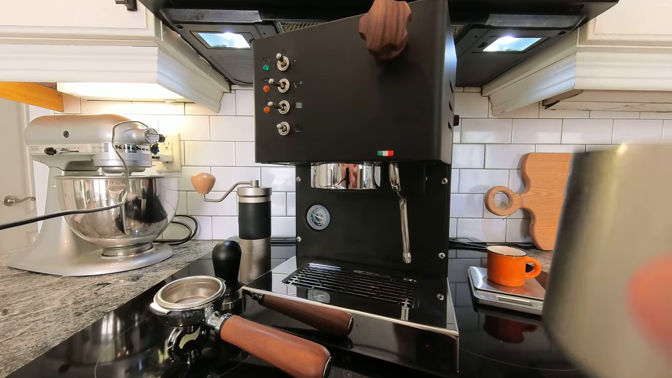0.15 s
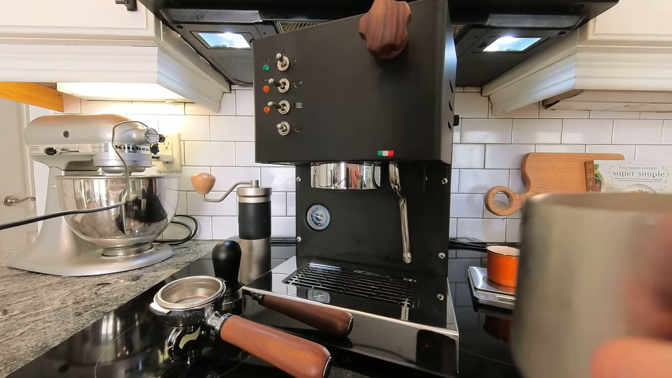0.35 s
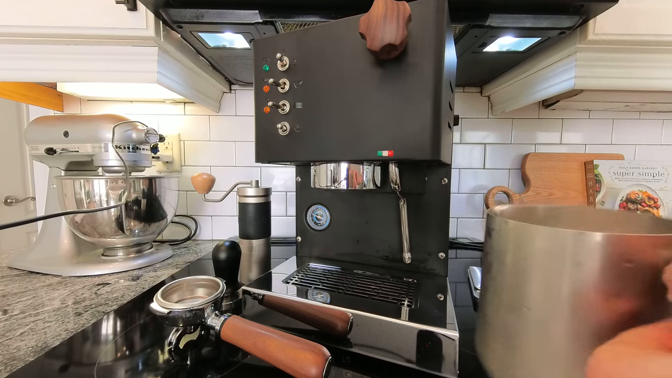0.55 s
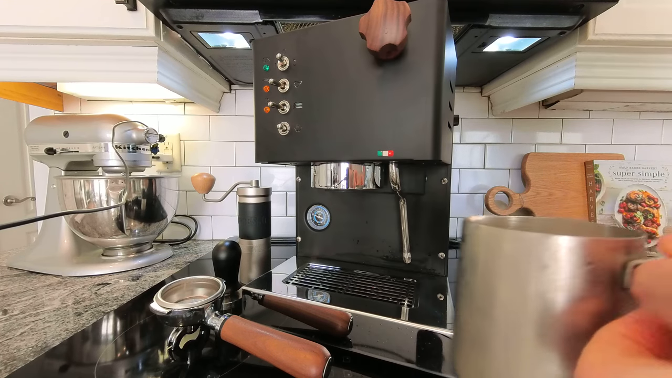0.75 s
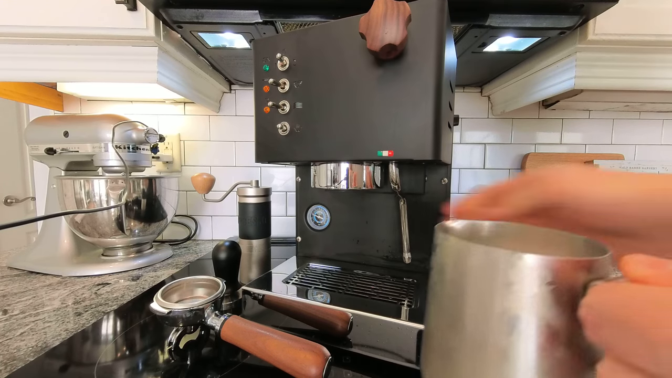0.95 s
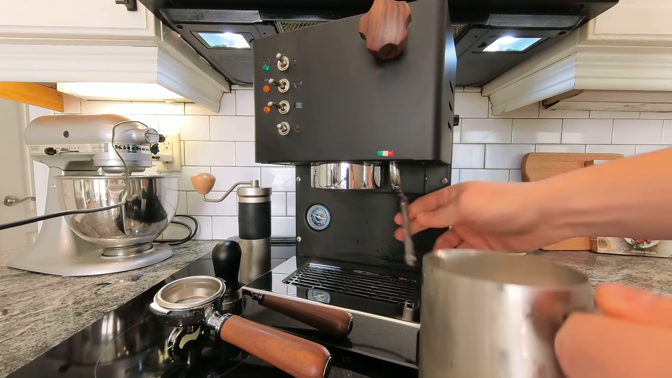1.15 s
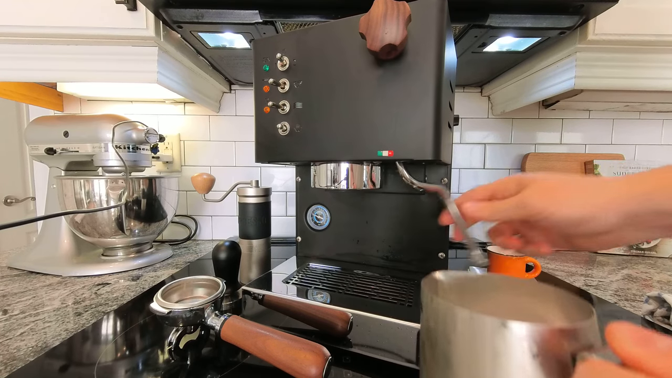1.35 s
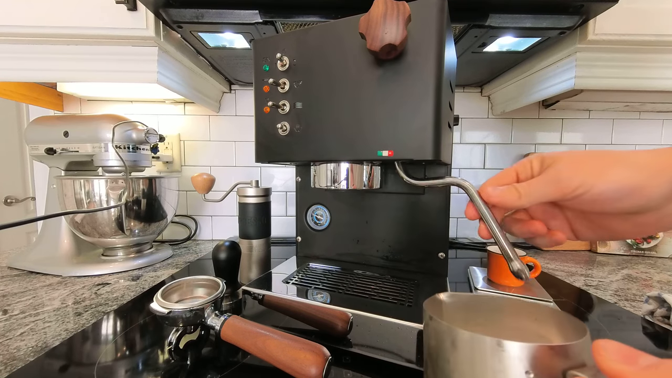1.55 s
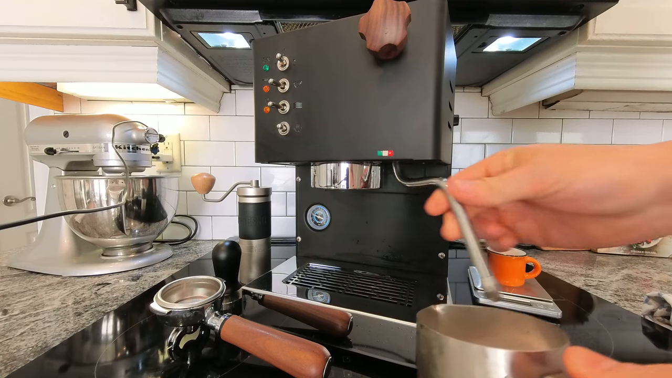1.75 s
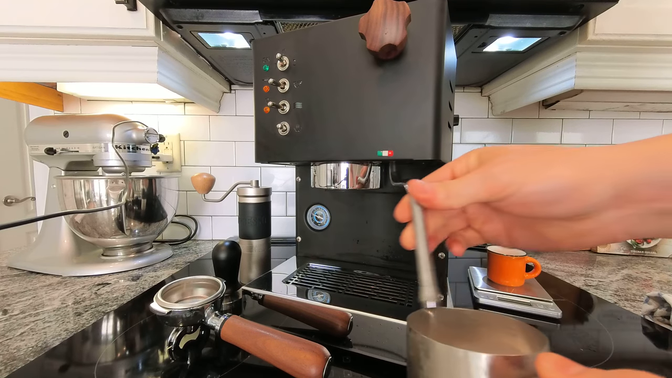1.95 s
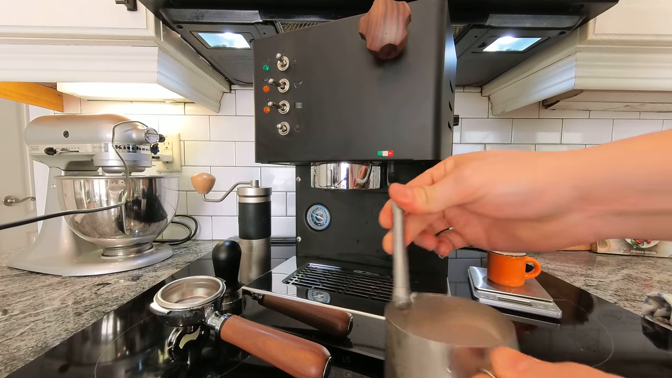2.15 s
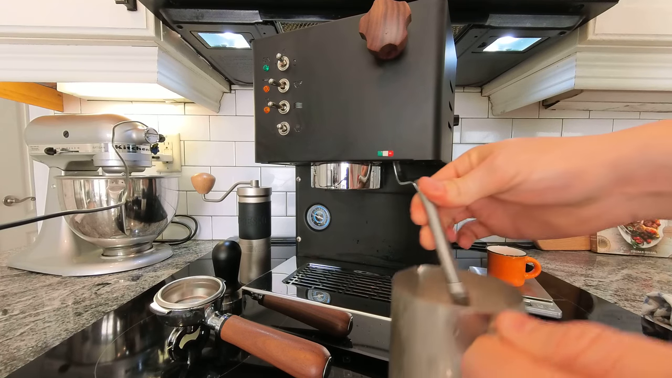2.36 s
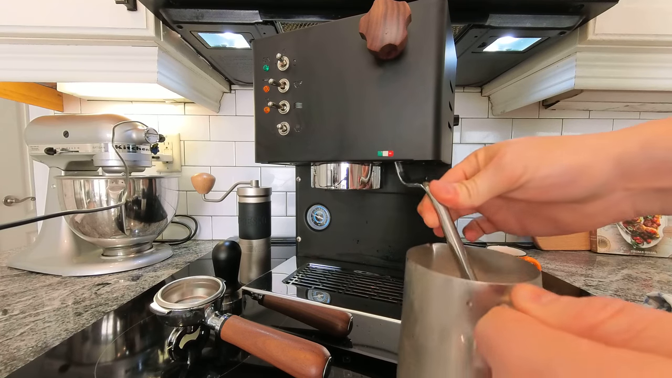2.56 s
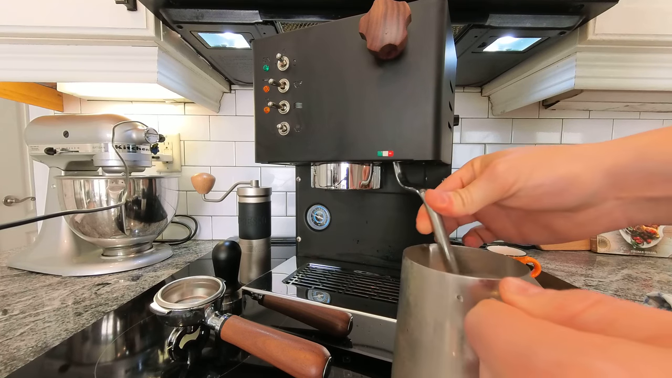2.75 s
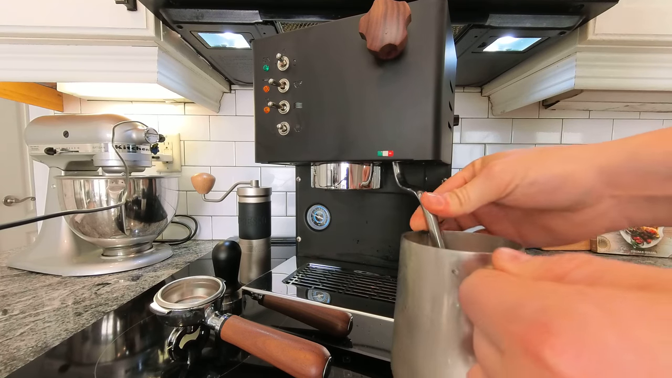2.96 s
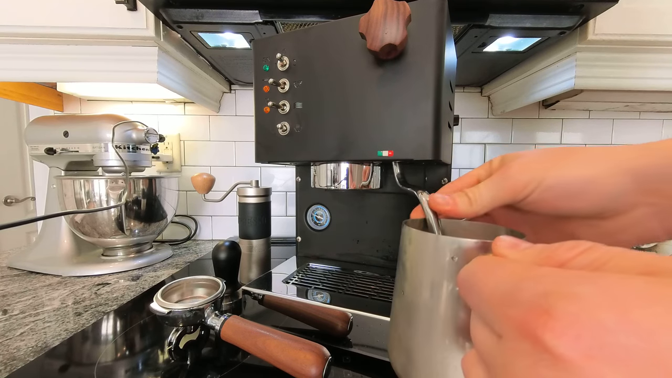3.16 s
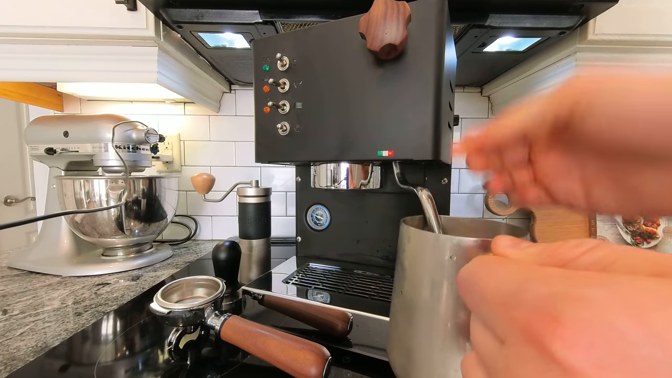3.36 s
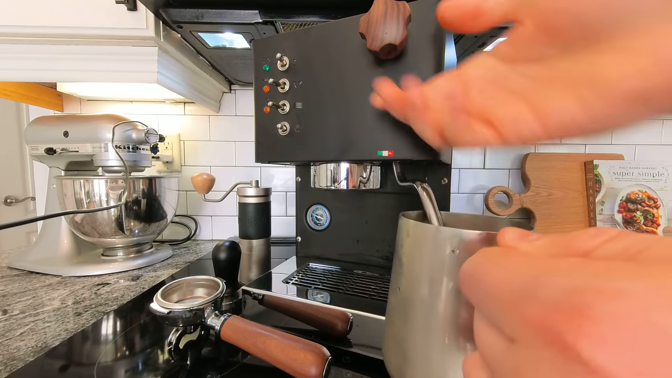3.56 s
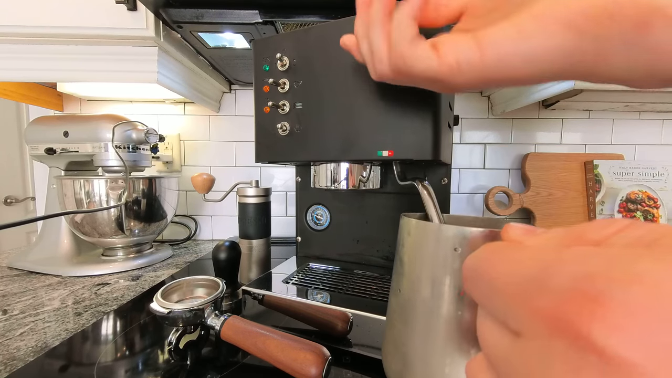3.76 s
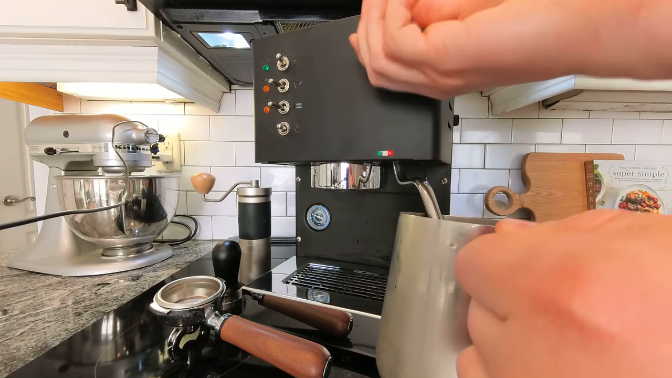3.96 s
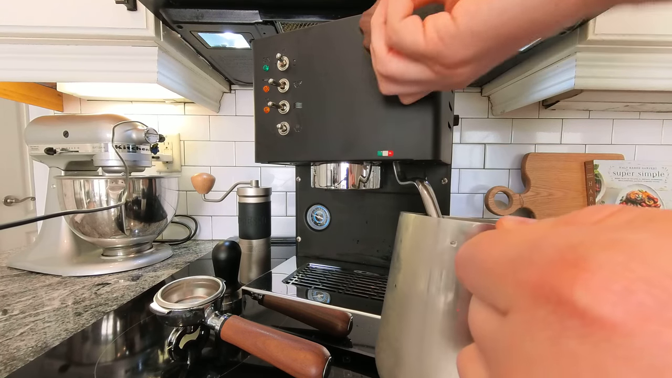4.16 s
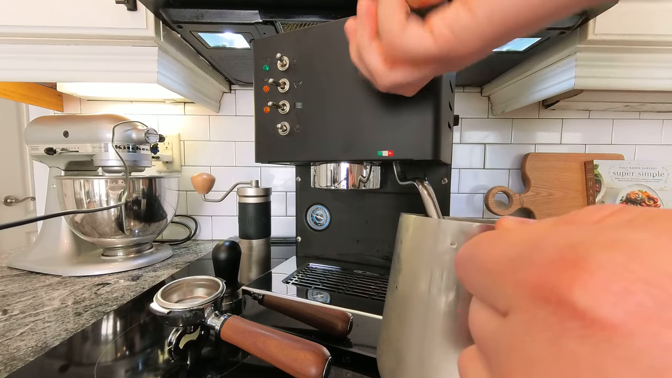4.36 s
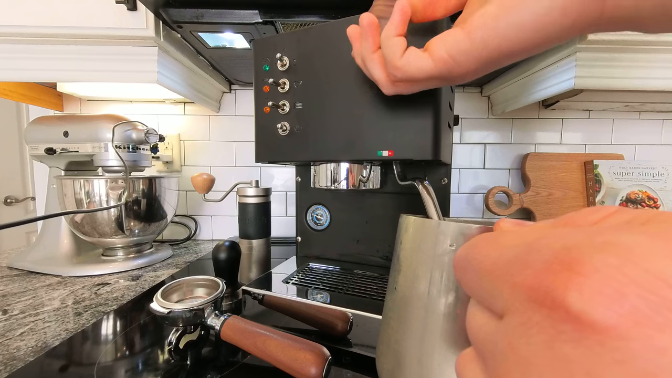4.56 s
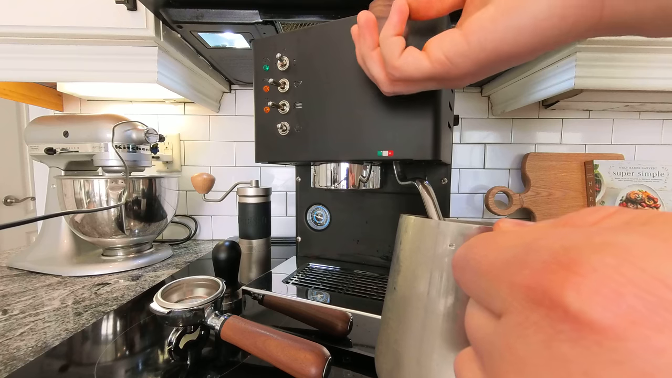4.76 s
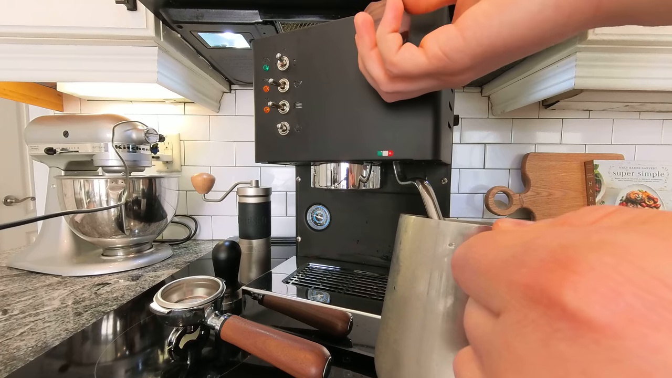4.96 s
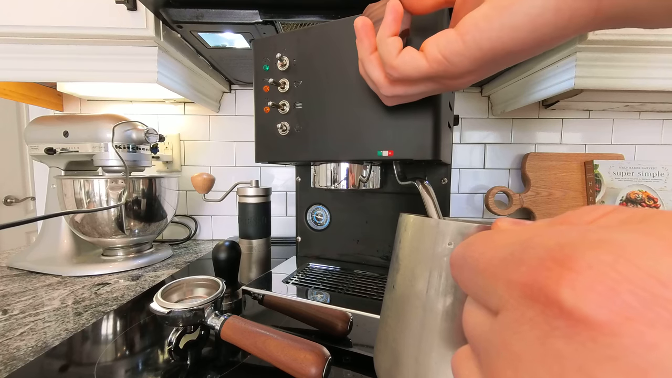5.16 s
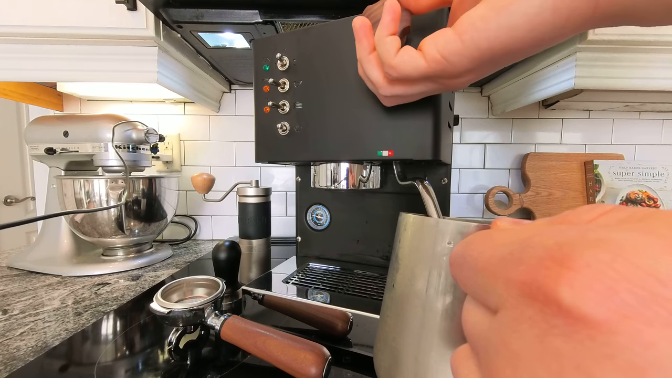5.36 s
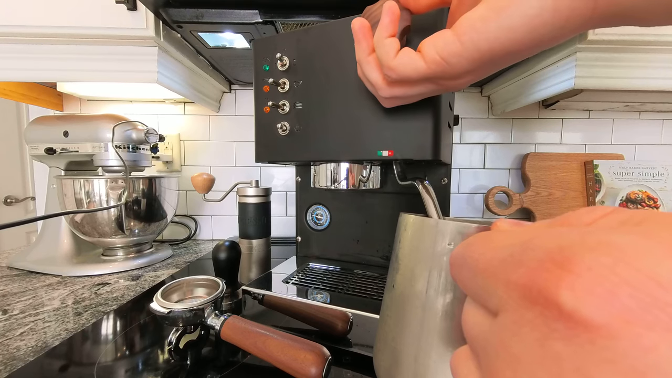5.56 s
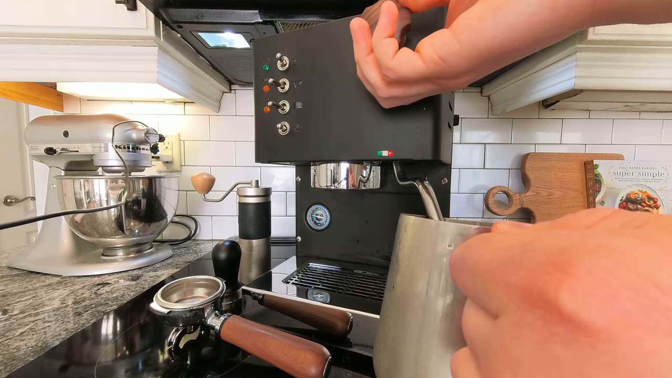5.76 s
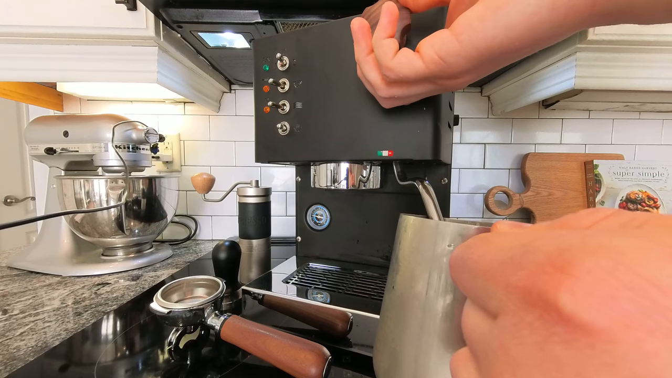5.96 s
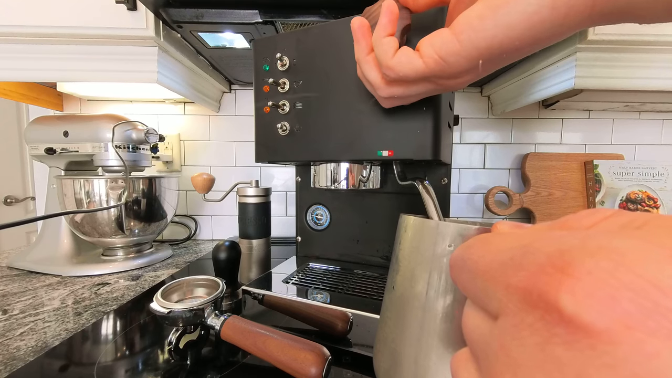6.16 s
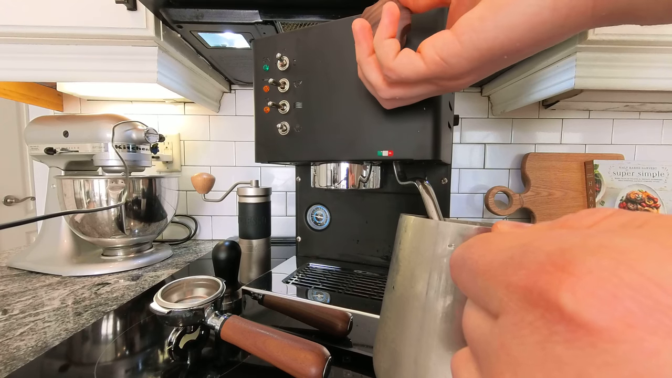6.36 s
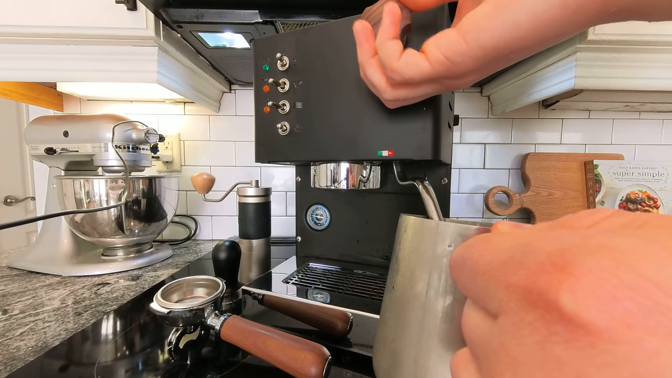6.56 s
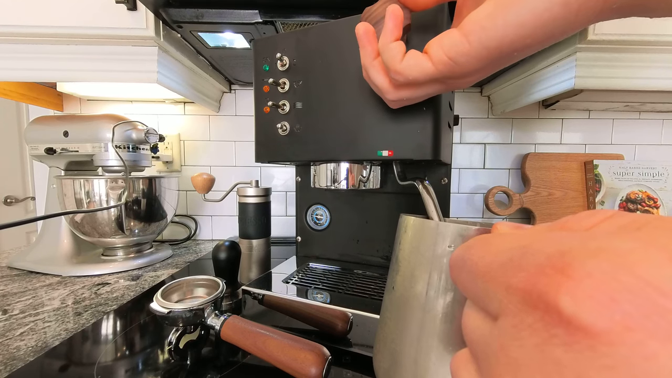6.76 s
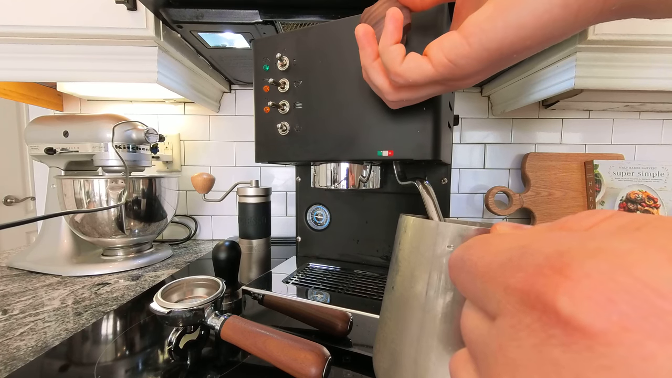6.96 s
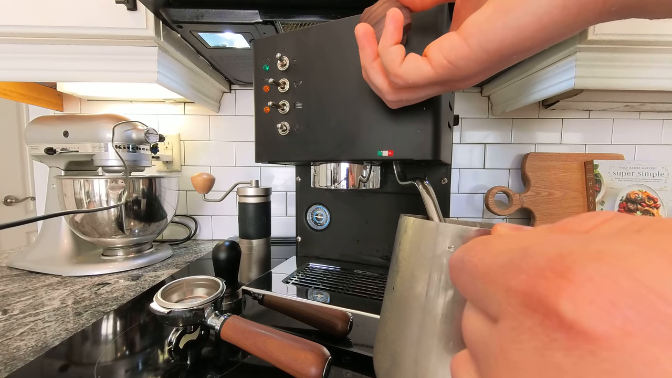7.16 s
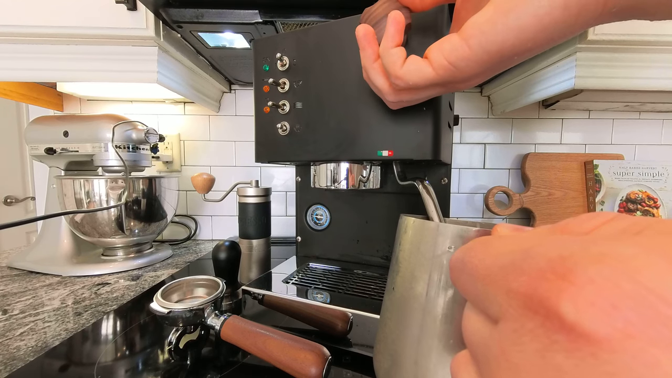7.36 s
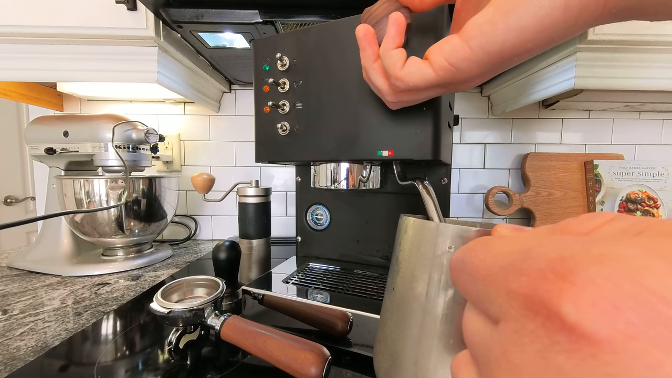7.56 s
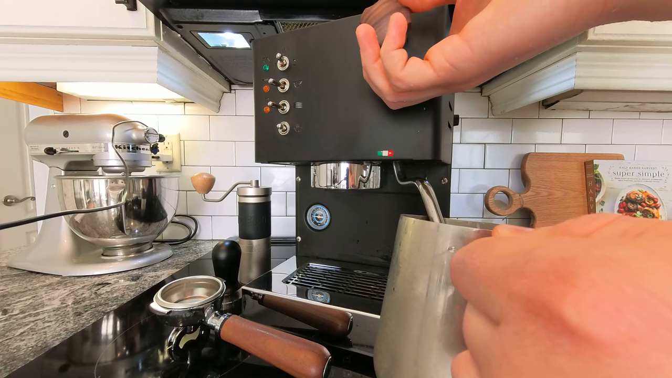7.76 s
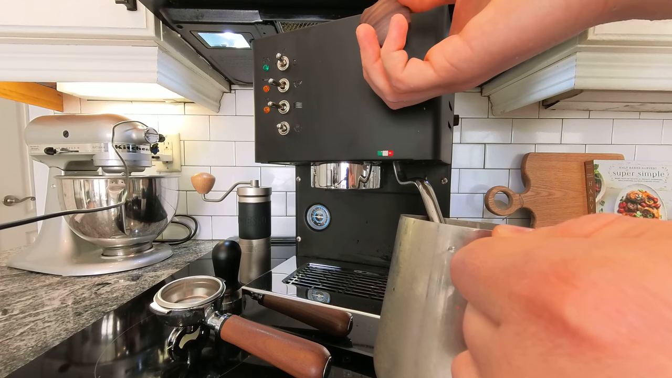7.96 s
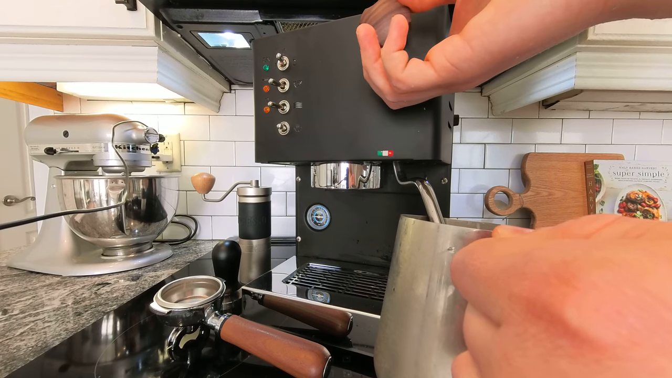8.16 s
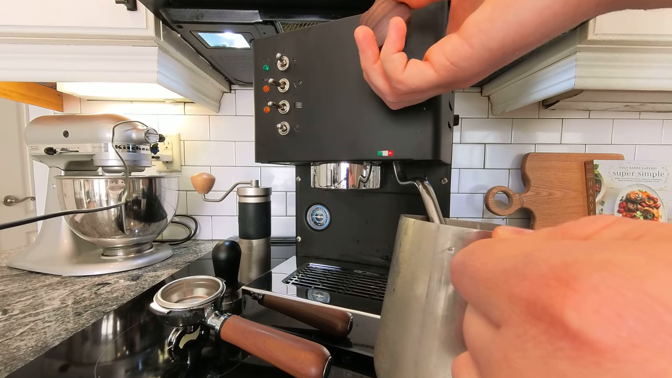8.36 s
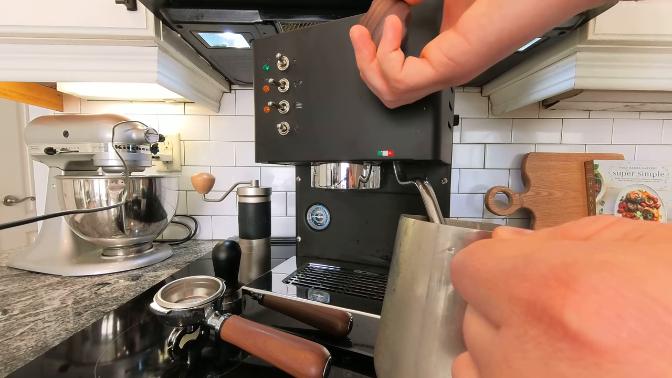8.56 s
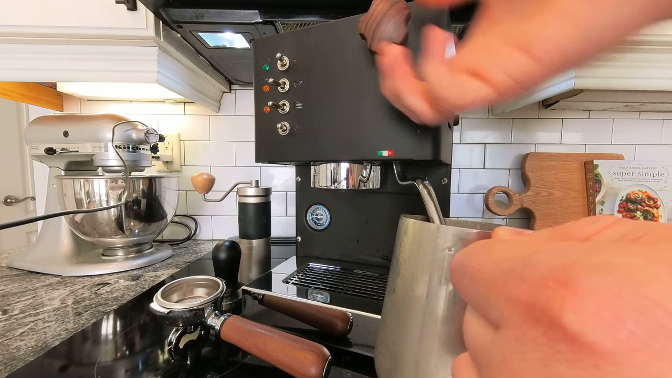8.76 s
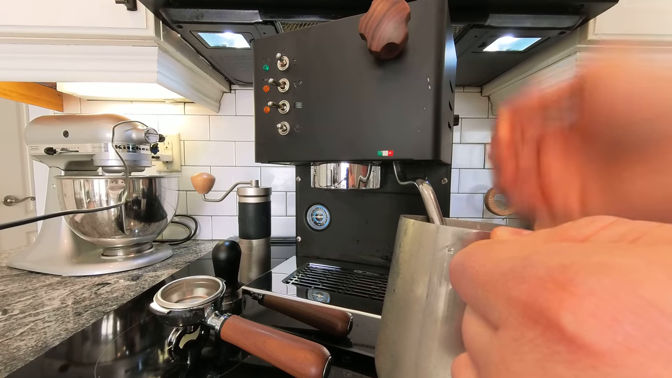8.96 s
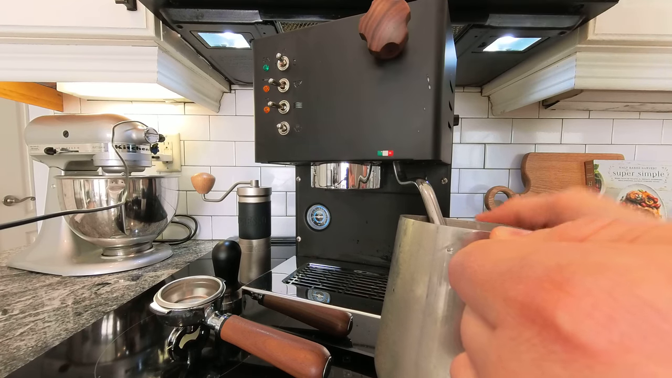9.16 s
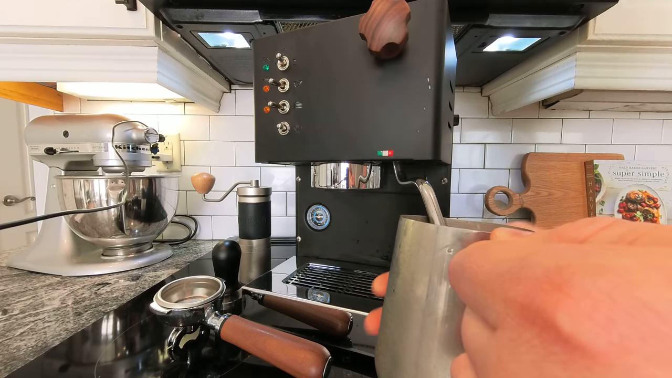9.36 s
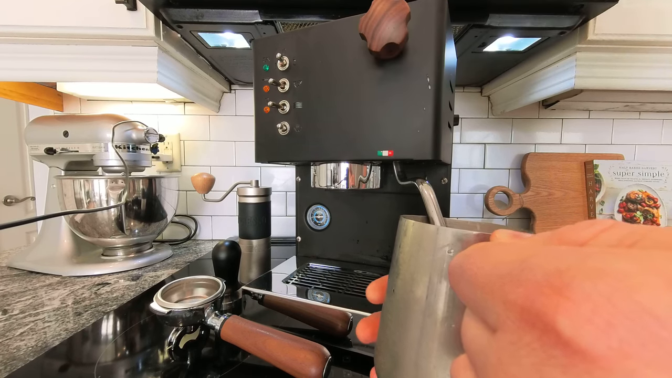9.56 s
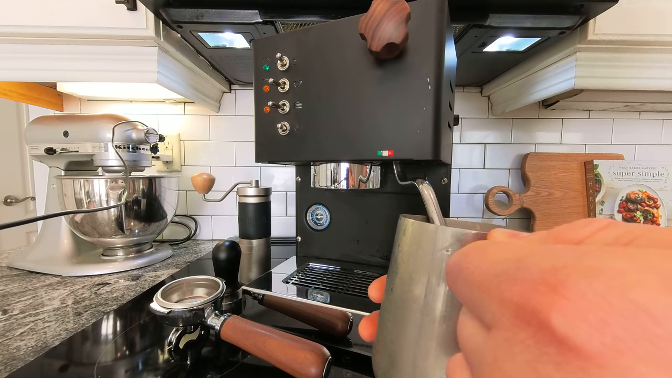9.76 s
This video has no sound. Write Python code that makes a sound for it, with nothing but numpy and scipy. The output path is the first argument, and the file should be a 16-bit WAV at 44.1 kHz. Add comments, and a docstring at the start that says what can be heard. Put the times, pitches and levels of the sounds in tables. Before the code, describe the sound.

A quiet small kitchen, heard closely in stereo with short hard-wall echoes. Up to 1 s there is little but a faint soft thump and hollow swishes. At 1.2 s a hand lands dully on a metal wand; at 1.35 s a strong knock thuds, with rubbing creaks until 1.7 s. A bright steel clink rings at 2.15 s, lighter clinks and scrapes follow around 2.7 and 3.2 s. A knob taps softly at 3.75 s and groans near 4 s. At 4.1 s water sputters, then a sharp steam shriek at 4.27 s quickly dies. From 4.3 to 6.1 s milk growls and squeals in irregular bouts over hiss, with rising whistles. Hard splutters at 5.9 and 6.4 s lead into loud churning, tearing froth, pulsing spits and splutters near 7.3 s. Low glugs cluster around 7.9-8.3 s; the steam weakens to patchy fizz, with spits and glugs at 9.4 s, continuing to the end.

```python
"""In a small, quiet kitchen a soft thump and faint swishes precede a steam wand's creaks, knocks and clinks.
The espresso machine's wand rubs in its joint and rings a steel milk pitcher: struck steel is a sum of modes.
The valve opens: deep in cold milk, collapsing steam bubbles squeal in bouts, as gliding tone bursts over noise.
Then the tip reaches the sloshing surface: coloured noise and random pops churn, tear, fizz and spit,
while large air pockets glug as decaying sines. Scattered echoes surround it all."""
import sys
import numpy as np
from scipy import signal
from scipy.fft import rfft, irfft
from scipy.io import wavfile
from scipy.ndimage import uniform_filter1d, map_coordinates

SR = 44100
rng = np.random.default_rng(int(sys.argv[2]) if len(sys.argv) > 2 else 0)


def waveform_to_disk(signal):
    """Save audio, clipped to [-1, 1], as 16-bit WAV at the path in sys.argv[1]."""
    frames = np.transpose(np.atleast_2d(signal))
    scaled = np.clip(frames, -1, 1) * 32767
    samples = np.round(scaled).astype(np.int16)
    wavfile.write(sys.argv[1], SR, samples)


N = 433062
T = np.arange(N) / SR  # time in s

# modes of the wand's joint: hz, relative_db, t60_s
JOINT_MODES = [(1051, 4.5, 0.18), (2500, 6.5, 0.06), (3020, 2, 0.087), (3950, -0.5, 0.082),
               (4250, -4.5, 0.063), (5885, 5, .05)]
# modes of the steel pitcher: hz, struck_on_wall_db, struck_on_rim_db, t60_s
PITCHER_MODES = [(780, -23, 8.5, .17), (1134, -6, -18, 0.45), (1133, 8, 5, 0.1), (1450, -15, 3.5, 0.18),
                 (1847, -28.5, -5, 0.15), (2710, -2, -2, 0.08), (2783, -19, -22, 0.33),
                 (3316, -11.5, -14, .13), (3730, -24, 0, 0.13), (5270, -21, -23.5, .35),
                 (6100, -0.5, -11, .07), (8495, -12, -25, .2)]
# modes of the wand: hz, relative_db, t60_s
WAND_MODES = [(1540, -9.5, 0.51), (3058, -7.5, .31), (3260, -7, 0.32), (4700, 0, 0.34), (4888, -3, 0.29),
              (5033, -8, 0.34), (6300, -7, .33), (6530, -4, 0.25), (7850, -3, 0.27), (9740, -8, 0.2)]
# large steam bubbles collapsing singly: start_s (middle of the squeal), level_db (before gain), pitch_hz, length_s
SINGLE_COLLAPSES = [(4.136, -18, 746, 0.0027), (4.158, -18, 1077, 0.0024), (4.202, -11, 1220, 0.0077),
                    (4.221, -9, 1140, 0.0052), (4.26, -10.5, 1144, 0.0071), (4.603, -11, 1089, 0.0089),
                    (4.629, -11, 1116, 0.0067), (4.644, -12, 1106, 0.0075), (4.843, -14, 1200, 0.0038),
                    (4.896, -11, 1210, 0.0043), (4.905, -10.5, 1192, 0.0068), (4.92, -13, 1040, 0.0038),
                    (4.924, -10.5, 1150, 0.0045), (4.933, -11, 1138, 0.0044), (5.091, -12.5, 1270, 0.0045),
                    (5.113, -9, 1217, 0.004), (5.242, -8.5, 1153, 0.0097), (5.269, -7.5, 1170, 0.0077),
                    (5.291, -9, 1162, 0.0083), (5.398, -11.5, 1146, 0.0074), (5.415, -10.5, 1250, 0.0047),
                    (5.579, -6.5, 1204, 0.0066), (5.595, -11, 1223, 0.0082), (5.605, -11.5, 1200, 0.0096),
                    (5.619, -16, 1240, 0.0039), (5.719, -18, 1215, 0.005), (5.766, -15.5, 1220, 0.0035),
                    (5.927, -9, 1340, 0.003), (5.935, -9, 1320, 0.0022), (5.953, -7.5, 1184, 0.0072),
                    (5.978, -9, 1280, 0.0071), (6.011, -8.5, 1340, 0.0026), (6.019, -9, 1154, 0.0044),
                    (6.069, -16, 1340, 0.0029), (6.081, -14.5, 1204, 0.0064), (6.284, -15.5, 1350, 0.0072),
                    (7.285, -7, 1210, 0.0034), (7.321, -13.5, 1290, 0.003)]
# bouts of bubbles collapsing in quick succession:
# start_s, length_s, level_db (before gain), first_hz, last_hz, change_by_end_db, bubbles_per_s
COLLAPSE_BOUTS = [(4.273, 0.039, -15.5, 1128, 1263, -8, 125), (4.39, 0.044, -16.5, 1011, 1273, 5.5, 115),
                  (4.444, .024, -12.5, 1313, 1186, 0.5, 90), (4.473, .119, -18, 799.5, 1061, 5, 110),
                  (4.488, 0.084, -16.5, 1260, 1220, -2, 95), (4.714, 0.056, -11, 1129, 1251, -3, 88),
                  (4.96, 0.026, -13, 998, 1014, 1.5, 150), (5.001, 0.026, -13.5, 974, 1130, -2.5, 140),
                  (5.042, 0.026, -12.5, 1087, 1188, -1.5, 130), (5.32, .037, -10.5, 1081, 1191, 0.5, 140),
                  (5.373, .017, -12.5, 1050, 1112, -2, 150), (5.638, 0.029, -9.5, 1131, 1159, -3, 140),
                  (5.679, .012, -22, 1173, 1230, -2, 160)]


def amp(db):
    """Level is logarithmic: 20 dB is a factor of ten in amplitude."""
    return 10 ** (np.asarray(db) / 20)


def unit(x):
    """Normalization: scales a signal to rms 1."""
    return x / np.sqrt(np.mean(x ** 2) + 1e-20)


def read(points, hz):
    """Interpolates a spectrum along a logarithmic frequency axis, which follows hearing."""
    f, value = np.transpose(points)
    return np.interp(np.log(hz + 1), np.log(f + 1), value)


def level(curve, order):
    """Envelope: one dB column of a curve as a gain over time, held at both ends."""
    rows = np.array(curve)
    return amp(np.interp(T, rows[:, 0], rows[:, order]))


def add(mix, s, sound):
    """Superposition: sums a sound into the mix from time s on."""
    part = mix[max(round(s * SR), 0):][:len(sound)]
    part += sound[:len(part)]


def ramp(start, length):
    """Linear transition from 0 to 1."""
    return np.clip((T - start) / length, 0, 1)


def colour(x, spectrum, band=(20, 20000)):
    """Minimum-phase filtering; white noise of rms 1 gets rms 1 when averaged over the band."""
    hz = np.abs(np.fft.fftfreq(4096, 1 / SR))
    gain = amp(read(spectrum, hz))
    in_band = (hz >= band[0]) * (hz <= band[1])
    gain = gain / np.sqrt(np.mean(gain ** 2 * in_band))
    # the Hilbert transform of the log gain gives the phase of a causal filter
    response = np.exp(np.conj(signal.hilbert(np.log(gain))))
    taps = np.fft.ifft(response).real
    return signal.oaconvolve(x, taps[:len(taps) // 2])[:len(x)]


def wander(rate):
    """Band-limited random modulation of rms 1: a smooth curve through rate chance values per second."""
    knots = rng.standard_normal(8192)
    curve = map_coordinates(knots, [T[::16] * rate], order=3, mode="wrap")
    return unit(curve).repeat(16)[:N]


def pops(per_s, spread_db):
    """Shot noise, scaled to rms 1: impulses of random time, sign and size, as from tiny bursting bubbles."""
    size = amp(spread_db * np.minimum(rng.exponential(1, N), 4))
    sign = rng.choice([-1, 1], N)
    return unit(size * sign * (rng.random(N) < per_s / SR))


def flutter(rate, depth_db):
    """Random amplitude modulation, limited in dB and scaled to rms 1."""
    return unit(amp(depth_db * 2 * np.tanh(wander(rate) / 2)))


def patchy(x, patchy_db, span_hz=450, span_s=.025):
    """Time-varying spectrum: a random gain field favours one pitch and then another, as bubble sizes change."""
    hz, t, z = signal.stft(x, SR, nperseg=512)
    grid = np.meshgrid(hz / span_hz, t / span_s, indexing="ij")
    field = map_coordinates(rng.standard_normal((128, 1024)), grid, order=1, mode="wrap")
    gain = unit(amp(patchy_db * np.clip(unit(field), -2, 2)))
    return signal.istft(z * gain, SR, nperseg=512)[1][:N]


def burst(t60):
    """Exponential decay: half a second of noise that falls 60 dB in t60 seconds."""
    t = T[:SR // 2]
    return rng.standard_normal(len(t)) * amp(-60 * t / t60)


def ring(modes, rough=0.24, spread_hz=22, bend=0.004, rattle_per_s=170, count=5):
    """Modal synthesis of struck solids: clusters of close partials decay, roughened by rattle and pitch bend."""
    t, out = T[:SR], np.zeros(SR)
    places = np.linspace(-1, 1, count)
    weights = np.exp(-places ** 2)
    weights = weights / np.linalg.norm(weights)
    for hz, db, t60 in modes:
        knots = rng.standard_normal((2, 512))
        rattle = rough * np.interp(t * rattle_per_s, np.arange(512), knots[0])
        pitch_drift = bend * np.interp(t * 16, np.arange(512), knots[1])
        turns = hz * np.cumsum(1 + pitch_drift) / SR
        offsets = spread_hz * (places + rng.uniform(-1, 1, count) / count)
        cluster = np.zeros(SR)
        for k, (weight, offset) in enumerate(zip(weights, offsets)):
            angle = 2 * np.pi * (turns + offset * t + rng.random())
            cluster += weight * np.sin(angle + (-1) ** k * rattle)
        out += amp(db - 60 * t / t60) * cluster
    return out


def fuzzy(length, first_hz, last_hz, width_hz):
    """Heterodyning: low-passed complex noise on a gliding carrier gives a soft-edged narrow band."""
    n = round(length * SR)
    lowpass = signal.butter(2, width_hz, fs=SR, output="sos")
    noise = [1, 1j] @ rng.standard_normal((2, SR // 2))
    fuzz = signal.sosfilt(lowpass, noise)[-n:]
    turns = np.cumsum(np.geomspace(first_hz, last_hz, n)) / SR
    tone = (fuzz * np.exp(2j * np.pi * turns)).real
    return unit(tone) * signal.windows.tukey(n, .5)


def swells(rows, gain_db=0):
    """Summed bell-shaped envelopes (hyperbolic secants) from rows of middle_s, level_db, length_s."""
    t, out = T[::16], np.zeros(len(T[::16]))
    for s, db, length in rows:
        out += amp(db + gain_db) / np.cosh(np.minimum(abs(t - s) / length * 2.6, 20))
    return out.repeat(16)[:N]


def strokes(rows, order):
    """Summed soft-edged envelopes from rows that begin start_s, length_s; order picks the level column."""
    out = np.zeros(N)
    for row in rows:
        add(out, row[0], amp(row[order]) * signal.windows.tukey(round(row[1] * SR), .4))
    return out


def sloshes(runs, length):
    """Periodic excitation: the milk sloshes near a steady rate and bares the tip once per slosh."""
    slosh_per_s = 12.8
    rows = []
    for s, span, first_db, last_db in runs:
        for u in np.linspace(0, 1, round(span * slosh_per_s) + 1):
            rows.append((s + u * span, first_db + u * (last_db - first_db), length))
    return swells(rows)


def thumps():
    """Low-frequency noise under bell-shaped envelopes: soft, dull pushes of bass."""
    # soft thumps: middle_s, level_db (before gain), length_s
    thump_events = [(.18, -65, .03), (5.3, -53, 0.068), (5.92, -45, 0.043), (6.04, -50, 0.056),
                    (6.185, -46, 0.039)]
    # their spectrum: hz, relative density_db
    thump_spectrum = [(25, -7), (60, -12), (130, -0.5), (250, -1.5), (700, -38)]
    return colour(rng.standard_normal(N) * swells(thump_events, gain_db=1), thump_spectrum)


def swishes(width_share=0.15):
    """Narrow-band noise: faint hollow swishes as the pitcher of milk is carried to the machine."""
    # swishes: start_s, length_s, level_db, pitch_hz
    swish_events = [(0.562, 0.076, -63.5, 1100), (0.796, 0.17, -64.5, 559)]
    out = np.zeros(N)
    for s, length, db, hz in swish_events:
        add(out, s, amp(db) * fuzzy(length, hz, hz, width_share * hz))
    return out


def handling(scrape_db=-1.5, joint_db=-5.0):
    """Stick-slip friction: the ball joint's slips shake the case; scraping steel excites the joint's modes."""
    # turning wand and rubbing steel: start_s, length_s, rumble_db, slip_db (before scrape and joint gains)
    rubs = [(.74, 0.091, -65, -66), (1.21, 0.23, -50.5, -75), (1.34, 0.24, -41, -59),
            (1.55, 0.14, -37, -53.5), (1.68, 0.081, -49.5, -85), (1.88, 0.24, -58, -85),
            (2.08, 0.4, -48.5, -71), (2.56, 0.26, -50, -77), (2.82, 0.313, -56, -74), (3.23, 0.1, -47, -84),
            (3.76, 0.12, -55, -88)]
    # spectra of the shaken case and of the scrape: hz, relative density_db
    rumble_spectrum = [(30, -46.5), (100, -15.5), (170, 4.5), (280, 1.5), (400, -8.5), (600, -13.5),
                       (900, -47), (3000, -64.5)]
    scrape_spectrum = [(600, -3), (1040, 4), (1400, -1.5), (2400, 1.5), (3000, 1), (3500, -9), (4200, 4),
                       (5000, -6), (9900, -4), (15000, -21)]
    rumble = colour(pops(per_s=690, spread_db=-0.5) * strokes(rubs, order=2), rumble_spectrum)
    slips = pops(per_s=6000, spread_db=4.0) * strokes(rubs, order=3)
    scrape = colour(patchy(slips, patchy_db=4.5), scrape_spectrum)
    modes = ring(JOINT_MODES, rough=0.75, spread_hz=90)
    joint = signal.oaconvolve(slips, modes / np.linalg.norm(modes))[:N]
    return rumble + amp(scrape_db) * scrape + amp(joint_db) * joint


def touches(t60=0.14):
    """A soft contact excites little treble: the hand lands on the wand with a dull, short knock."""
    # landings of the hand: start_s, level_db (before the low-pass), top_hz
    landings = [(1.201, -39, 1000)]
    # their spectrum: hz, relative density_db
    touch_spectrum = [(60, -15.5), (260, 13), (400, 0.5), (650, -11.5), (900, -6), (1500, -25)]
    out = np.zeros(N)
    for s, db, top_hz in landings:
        lowpass = signal.butter(4, top_hz, fs=SR, output="sos")
        add(out, s, amp(db) * signal.sosfilt(lowpass, burst(t60)))
    return colour(out, touch_spectrum)


def blows():
    """Impact excitation: knocks thud in the case and ring the joint; clinks ring the pitcher and the wand."""
    # knocks on the machine's case: start_s, thud_db, click_db, joint_ring_db
    knocks = [(1.349, -18.5, -24.5, -35), (1.475, -39, -42, -57), (3.24, -41.5, -58, -80)]
    # wand against pitcher: start_s, click_db (before a 0.5 dB cut), pitcher_ring_db, wand_ring_db,
    # place (0 inner wall to 1 rim)
    clinks = [(2.151, -20, -36.5, -38, 0.66), (2.697, -27.5, -37.5, -64, 0.089),
              (3.225, -28.5, -40, -76, 0.84), (3.24, -25.5, -40.5, -71, 0.99)]
    # spectra of the thudding case and of the clicks: hz, relative density_db
    case_spectrum = [(30, -42.5), (90, -10.5), (160, -7), (350, -1.5), (560, -8.5), (800, -23), (1050, -23),
                     (1350, -29), (1900, -20), (2900, -21.5), (4200, -27.5), (5500, -38.5), (12000, -61.5)]
    click_spectrum = [(150, -28), (450, 6.5), (1150, 8.5), (1900, -14.5), (2900, 0), (4800, 0), (8000, 1.5),
                      (11000, -4.5), (15000, -43)]
    thuds, clicks, rings = np.zeros((3, N))
    for s, thud_db, click_db, joint_db in knocks:
        add(rings, s, amp(joint_db) * ring(JOINT_MODES))
        add(thuds, s, amp(thud_db) * burst(t60=0.24))
        add(clicks, s, amp(click_db) * burst(t60=0.03))
    for s, click_db, pitcher_db, wand_db, place in clinks:
        # where the blow lands decides how strongly each mode is excited
        struck = []
        for hz, wall_db, rim_db, t60 in PITCHER_MODES:
            struck.append((hz, wall_db + np.clip(place, 0, 1) * (rim_db - wall_db), t60))
        add(clicks, s, amp(click_db - 0.5) * burst(t60=0.045))
        add(rings, s, amp(pitcher_db) * ring(struck, rough=.8, spread_hz=45, bend=0.014))
        add(rings, s, amp(wand_db) * ring(WAND_MODES, rough=0.64, spread_hz=70.3))
    wavering = rings * flutter(rate=130, depth_db=3.5)
    return colour(thuds, case_spectrum) + colour(clicks, click_spectrum) + wavering


def grazes(top_hz=1400, damping_db_per_s=170):
    """Damped modes: a light graze wakes mainly the wand's lowest ring, and the fingers damp it."""
    # wand grazing the pitcher: start_s, level_db (before low-pass and damping)
    graze_events = [(2.562, -46.5), (2.646, -52)]
    lowpass = signal.butter(3, top_hz, fs=SR, output="sos")
    out = np.zeros(N)
    for s, db in graze_events:
        soft = signal.sosfilt(lowpass, ring(WAND_MODES, rough=1.0))
        add(out, s, amp(db - damping_db_per_s * T[:SR]) * soft)
    return out


def sliding():
    """Friction as many impacts: tiny slips of the wand on the inner wall keep the pitcher's modes ringing."""
    # wand sliding down the inner wall: start_s, length_s, level_db
    slides = [(2.72, 0.15, -67), (2.85, 0.095, -59.5), (3.06, .04, -69)]
    modes = ring([(hz, wall_db, t60) for hz, wall_db, rim_db, t60 in PITCHER_MODES])
    slips = pops(per_s=500, spread_db=3.5) * strokes(slides, order=2)
    return signal.oaconvolve(slips, modes / np.linalg.norm(modes))[:N]


def knob(width_hz=35):
    """Modal taps as fingers land on the wooden knob and the valve unseats; its turning stem groans in between."""
    # modes of the steam knob: hz, relative_db, t60_s
    knob_modes = [(340, 0.5, 0.25), (406, -1, .16), (900, -12, .09), (1030, -6, .13), (1520, -16, .08),
                  (2110, -13, .11), (2780, -23, .09)]
    # taps on the knob: start_s, level_db
    knob_taps = [(3.741, -41.5), (4.092, -43)]
    out = np.zeros(N)
    for s, db in knob_taps:
        attack = np.minimum(T[:SR] / 0.0013, 1)
        add(out, s, amp(db) * ring(knob_modes, rough=0.93, spread_hz=85) * attack)
    turn_s, turn_length_s, turn_db, first_hz, last_hz = 3.975, .15, -47, 192, 238
    add(out, turn_s, amp(turn_db) * fuzzy(turn_length_s, first_hz, last_hz, width_hz))
    return out


def deep_steam(jet_db=0.5):
    """Cavitation and jet noise: small bubbles simmer, more loudly around large collapses; the deep jet hisses."""
    # hiss of the submerged jet: time_s, level_db (before jet gain)
    hiss_curve = [(4.42, -37.5), (4.68, -39), (4.86, -35), (4.98, -38), (5.2, -38), (5.4, -42.5),
                  (5.6, -40), (5.85, -42.5), (5.92, -35.5), (6.01, -39.5), (6.1, -39)]
    # spectra of the simmer and of the jet: hz, relative density_db
    simmer_spectrum = [(40, -66), (150, -18), (400, -5.5), (850, -1.5), (1200, 19.5), (1450, 13),
                       (1750, -7), (5000, -71)]
    jet_spectrum = [(400, -55), (1250, -5), (1680, 0), (2050, 8), (2500, -1.5), (3250, 0.5), (3800, 1),
                    (4200, 0.5), (4620, 4.5), (5150, -7), (6250, -5), (6700, -6), (7250, 1.5), (7750, -9.5),
                    (8400, -2.5), (8900, -6.5), (9600, -6.5), (10200, -9), (10800, -8), (12200, -19),
                    (13500, -28), (14500, -43)]
    valve_s, opening_s, shut_db = 4.09, 0.2, -35  # the valve starts to open, takes this long, starts this far down
    simmer_db, warming_db_per_s, rest_db = -43, -4, -6.5  # when stirred; decline as milk warms; drop at rest
    stir_s = 0.01  # a collapse keeps the simmer stirred this much longer

    simmer = pops(per_s=3900, spread_db=4.5) * flutter(rate=130, depth_db=3.5)
    simmer = colour(patchy(simmer, patchy_db=2.5), simmer_spectrum, band=(400, 800))
    jet = pops(per_s=20000, spread_db=3.0) * flutter(rate=69, depth_db=2.5)
    jet = colour(patchy(jet, patchy_db=3.5), jet_spectrum, band=(3600, 12000))
    valve = (T > valve_s) * amp(shut_db * (1 - ramp(valve_s, opening_s)))

    spans = [(s, span) for s, span, *_ in COLLAPSE_BOUTS]
    spans += [(s, length) for s, db, hz, length in SINGLE_COLLAPSES]
    stirred = np.zeros(N)
    for s, span in spans:
        stirred[round(s * SR):round((s + span + stir_s) * SR)] = 1
    at_rest = 1 - uniform_filter1d(stirred, size=300)
    simmering = amp(simmer_db + warming_db_per_s * (T - valve_s) + rest_db * at_rest)
    return valve * (simmer * simmering + amp(jet_db) * jet * level(hiss_curve, 1))


def sputter():
    """Two-phase flow: water spurts as the valve opens; then dry steam shrieks through the nozzle and dies away."""
    # condensed water blown out of the wand: start_s, length_s, level_db
    water_spurts = [(4.1, 0.066, -37), (4.13, 0.16, -28.5), (4.43, 0.184, -42)]
    # spectra of the water and of the nozzle: hz, relative density_db
    water_spectrum = [(100, -42), (250, -5.5), (450, -8.5), (750, 0), (1000, 1), (1400, -2), (1750, -30),
                      (2500, -30), (8000, -59)]
    nozzle_spectrum = [(150, -21.5), (2500, -6.5), (3400, -10.5), (4000, 4.5), (4800, -13.5), (6300, -6.5),
                       (7400, 6.5), (7900, -9), (8400, 3), (9400, -12.5), (10800, -9.5), (12500, -20),
                       (14500, -43)]
    water = patchy(pops(per_s=1300, spread_db=3.0), patchy_db=2.5) * strokes(water_spurts, order=2)
    # the first blast of dry steam, before milk covers the jet
    blast_s, rise_s, blast_db, fall_db_per_s = 4.265, 0.025, -17.5, 157
    falling = amp(blast_db - fall_db_per_s * np.maximum(T - blast_s - rise_s, 0))
    blast = patchy(rng.standard_normal(N), patchy_db=1.0) * ramp(blast_s, rise_s) * falling
    return colour(water, water_spectrum) + colour(blast, nozzle_spectrum)


def bubbles(uneven=.25, spread_db=1.0, scatter=0.041, slip=.11, length=0.0052, vary=0.24):
    """Phase coherence: a bout's bubbles (s, dB, Hz, length s, phase turns) ring nearly in step, as one growl."""
    slowing = 1.15  # above 1, the gaps between bubbles grow
    rows = []
    chances = rng.uniform(-1, 1, (len(COLLAPSE_BOUTS), 64, 5))
    for (s, span, db, first_hz, last_hz, change_db, per_s), chance in zip(COLLAPSE_BOUTS, chances):
        gap, size, tune, life, lag = chance[:max(round(span * per_s), 1) + 1].T
        steps = np.cumsum(np.exp(uneven * gap))
        u = ((steps - steps[0]) / (steps[-1] - steps[0])) ** slowing
        pitch = first_hz + (last_hz - first_hz) * u
        # the turns of a common gliding tone up to each bubble
        phase = span * u * (first_hz + pitch) / 2 + slip * lag + rng.random()
        levels = db + change_db * u + spread_db * size
        rows += zip(s + u * span, levels, pitch * (1 + scatter * tune), length * np.exp(vary * life), phase)
    return rows


def squeals(glide=0.072, climb=0.056, overtone_db=-29, undertone_db=-31, gain_db=-1.13, rough=0.22, edge=2.83):
    """Bubble resonance: each swells, rings briefly and collapses; pitch tends to climb as the bubble shrinks."""
    out, t = np.zeros(N), T[:SR // 25] - 1 / 50  # t is 0 at the middle of the squeal
    singles = [(*row, rng.random()) for row in SINGLE_COLLAPSES]
    for (s, db, hz, length, phase), bend in zip(singles + bubbles(), rng.uniform(-1, 1, 256)):
        shape = .5 ** (abs(2 * t / length) ** edge)  # length is the width at half amplitude
        pitch = hz * (1 + (climb + glide * bend) * np.tanh(2 * t / length))
        turns = np.cumsum(pitch) / SR
        angle = 2 * np.pi * (phase + turns - turns[len(t) // 2])
        tone = shape * np.sin(angle)
        tone += amp(overtone_db) * shape ** 2 * np.sin(2 * angle)
        tone += amp(undertone_db) * shape * np.sin(angle / 2)
        add(out, s + t[0], amp(db + gain_db) * tone)
    return out * (1 + rough * uniform_filter1d(wander(rate=660), size=32))


def spurts(t60=0.07):
    """Impulsive collapse: a shallow steam pocket bursts with a short, hard splutter of decaying noise."""
    # steam pockets bursting: start_s, level_db
    pocket_bursts = [(4.134, -37), (4.217, -28), (5.925, -17.5), (6.281, -34), (6.372, -17), (7.282, -19),
                     (7.322, -21.5)]
    # their spectrum: hz, relative density_db
    spurt_spectrum = [(150, -17), (600, -6), (1250, 10.5), (1700, -1), (2200, -4), (3200, -3), (5000, -14),
                      (12000, -54)]
    out = np.zeros(N)
    for s, db in pocket_bursts:
        add(out, s, amp(db) * burst(t60))
    return colour(out, spurt_spectrum)


def whistles(width_share=0.058):
    """Cavity resonance: fuzzy tones, most of which climb as a steam pocket shrinks."""
    # whistles, quick chirps near the surface: start_s, length_s, level_db, first_hz, last_hz
    whistle_events = [(4.282, .13, -34, 770, 1068), (4.435, 0.11, -32, 687, 965),
                      (4.743, 0.22, -38, 3600, 4200), (5.082, 0.17, -36, 1880, 2583),
                      (5.449, 0.14, -37, 1926, 2790), (5.886, 0.038, -31.5, 3160, 3060),
                      (6.28, 0.024, -30.5, 2540, 3140), (6.301, 0.014, -29, 1430, 2200)]
    out = np.zeros(N)
    for s, length, db, first_hz, last_hz in whistle_events:
        add(out, s, amp(db) * fuzzy(length, first_hz, last_hz, width_share * first_hz))
    return out


def spits(gain_db=-2.0):
    """Droplet noise: bright pops gated by the sloshing, as the bared jet throws a brief spray."""
    # runs of spits, one per slosh: start_s, length_s, first_db, last_db (before gain)
    spit_runs = [(5.801, 0.096, -32, -29), (6.142, .197, -29.5, -24.5), (6.475, 0.11, -25, -28),
                 (6.93, .342, -24.5, -25.5), (7.87, 0.074, -25.5, -21), (8.311, 0.065, -27.5, -34.5),
                 (8.524, 0.072, -26.5, -27.5), (8.92, 0, -26.5, -28), (9.06, 0, -35, -34),
                 (9.21, 0, -32.5, -29), (9.362, 0.04, -22.5, -26.5), (9.46, 0, -29, -30),
                 (9.678, .115, -30.5, -31.5)]
    # their spectrum: hz, relative density_db
    spray_spectrum = [(60, -53), (300, -11), (1300, -2), (2500, -14), (4200, -7), (5100, -0.5),
                      (5900, -5.5), (7100, 4.5), (7800, -6.5), (8600, 3.5), (10300, -5), (11700, -6.5),
                      (13000, -22), (15500, -36)]
    spray = patchy(pops(per_s=11000, spread_db=4.0), patchy_db=6) * sloshes(spit_runs, length=0.028)
    return amp(gain_db) * colour(spray, spray_spectrum)


def foaming(x):
    """Shrinking cavity: growing foam narrows the air space above it; resampling makes its resonances climb."""
    foam_s, rise_per_s = 7.0, .017  # when the pitch is as listed, and the share by which it climbs
    return map_coordinates(x, [SR * (T + rise_per_s * (T - foam_s) ** 2 / 2)], order=3, mode="wrap")


def surface_steam(churn_db=0, tear_db=0.5, fizz_db=-1.5, gulp_churn_db=-13, gulp_tear_db=-2):
    """Air entrainment: milk churns, air torn in quick gulps rings near 3 kHz, and bursting foam bubbles fizz."""
    # the tip at the surface: time_s, churn_db, tear_db, fizz_db (each before its gain)
    surface_curve = [(6.33, -31.5, -37, -41), (6.65, -31, -26.5, -35), (7.05, -33.5, -28.5, -37),
                     (7.39, -31, -28, -43.5), (7.69, -36.5, -35, -43), (7.91, -36, -31.5, -39.5),
                     (8.62, -41.5, -42.5, -44.5), (9.24, -39.5, -36.5, -38.5), (9.82, -44.5, -39, -45)]
    # runs of air gulps, one per slosh: start_s, length_s, first_db, last_db (before the gulp gains)
    gulp_runs = [(6.45, 0.46, -23, -20), (7.265, 0.18, -26, -24), (7.53, 0.17, -20.5, -28),
                 (8.03, 0.07, -29, -26), (8.915, 0.073, -29.5, -42)]
    # spectra of the churning, the tearing and the fizz: hz, relative density_db
    churn_spectrum = [(30, -40), (130, -24.5), (190, 4), (260, 2), (480, -4.5), (1000, 6), (1420, 12),
                      (1680, -3), (2000, 4.5), (2500, -8), (10000, -54)]
    tear_spectrum = [(1200, -45), (2400, -12.5), (2850, -8), (3150, 6), (3330, -2), (3600, -7),
                     (4400, -12.5), (5200, -17.5), (7000, -34), (13000, -61)]
    fizz_spectrum = [(2500, -14), (4200, -5.5), (4950, 11), (5700, 1), (6500, 4), (7000, 6.5), (7800, 1),
                     (8600, 1), (10200, -8), (11500, -12.5), (12800, -29), (15000, -99)]
    uneven = flutter(rate=110, depth_db=2) * flutter(rate=26, depth_db=2.0)
    churn = pops(per_s=3000, spread_db=1.5) * uneven
    churn = colour(patchy(churn, patchy_db=1.5), churn_spectrum, band=(500, 2400))
    tear = pops(per_s=3800, spread_db=4.0) * uneven * flutter(rate=49, depth_db=2.0)
    tear = foaming(colour(patchy(tear, patchy_db=3.0), tear_spectrum, band=(2800, 4400)))
    fizz = pops(per_s=6200, spread_db=2.0) * flutter(rate=160, depth_db=3.0) * flutter(rate=18, depth_db=3.5)
    fizz = colour(patchy(fizz, patchy_db=3.5), fizz_spectrum, band=(5500, 12000))
    gulps = sloshes(gulp_runs, length=0.038)
    # steady and gulped parts add as powers
    churning = np.hypot(amp(churn_db) * level(surface_curve, 1), amp(gulp_churn_db) * gulps)
    tearing = np.hypot(amp(tear_db) * level(surface_curve, 2), amp(gulp_tear_db) * gulps)
    return churn * churning + tear * tearing + amp(fizz_db) * fizz * level(surface_curve, 3)


def gushes(width_hz=600):
    """Flow noise: air sucked in through a narrowing gap gives a coarse, rising hiss."""
    # gushes at the bare tip: start_s, length_s, level_db (before flutter), first_hz, last_hz
    gush_events = [(6.549, .21, -34, 3680, 4590), (6.757, .2, -31, 4200, 5270),
                   (8.895, .45, -57, 4430, 5040)]
    out = np.zeros(N)
    for s, length, db, first_hz, last_hz in gush_events:
        add(out, s, amp(db) * fuzzy(length, first_hz, last_hz, width_hz))
    return out * flutter(rate=60, depth_db=6.0)


def glugs(rise=0.0084, decay=0.025, glide=1.0, gain_db=1):
    """Damped bubble resonance: large air pockets ring low, rising a little in pitch."""
    # air pockets gulped by the whirlpool: start_s, level_db (before gain and envelope), starting pitch_hz
    air_pockets = [(6.711, -33, 225), (6.933, -29.5, 185), (7.289, -32.5, 179), (7.87, -26.5, 188),
                   (7.933, -25.5, 187), (8.115, -31.5, 195), (8.308, -28.5, 195), (9.36, -28.5, 202),
                   (9.403, -32.5, 174)]
    out, t = np.zeros(N), T[:SR // 4]
    envelope = (1 - np.exp(-t / rise)) * np.exp(-t / decay)
    for s, db, hz in air_pockets:
        add(out, s, amp(db + gain_db) * envelope * np.sin(2 * np.pi * hz * t * (1 + glide * t)))
    return out


def kitchen(x):
    """Reverberation: scattered echoes from tiles and cupboards, each band dying at its own speed."""
    # reverberation time: hz, t60_s
    room_decay = [(150, 0.49), (1000, 0.35), (5000, 0.21), (12000, 0.26)]
    taps = rng.choice([-1., 1.], SR // 2) * (rng.random(SR // 2) < 1 / 20)
    taps = taps * (T[:SR // 2] > .004)  # no echo within the first 4 ms
    hz, t, z = signal.stft(taps, SR, nperseg=256)
    decay = amp(-60 * t / read(room_decay, hz)[:, None])
    tail = signal.istft(z * decay, SR, nperseg=256)[1]
    return signal.oaconvolve(x, tail / np.linalg.norm(tail))[:N]


def scene():
    """Superposition of sources as the tip rises from deep to shallow; mainly the treble spreads between the ears."""
    # spectrum of the quiet room: hz, relative density_db
    quiet_spectrum = [(25, -19), (70, -13), (140, -12.5), (260, -7), (500, -20), (1100, -28), (1800, -34.5),
                      (8000, -36), (15000, -74)]
    # gain of the side signal: hz, side_db
    width_spectrum = [(1900, -79), (2600, -87), (3300, -18), (5000, -9.5), (7500, -11), (12000, -27)]
    raised = ramp(start=6.1, length=0.17)  # the tip comes up to the surface
    steam = np.sqrt(1 - raised) * deep_steam() + np.sqrt(raised) * surface_steam()
    steam = steam + sputter() + squeals() + spurts() + whistles() + spits() + gushes() + glugs()
    near = thumps() + swishes() + handling() + touches() + blows() + grazes() + sliding() + knob() + steam
    quiet = amp(-66) * colour(rng.standard_normal(N), quiet_spectrum)
    mid = near + amp(-11.5) * kitchen(near) + quiet
    # a reflection off the steel swings the phase between the ears from one frequency to the next;
    # the room's echoes differ between the ears too
    hz = np.fft.rfftfreq(N, 1 / SR)
    swing = 1j * np.sin(2 * np.pi * hz / 520)
    spread = rfft(mid) * swing + amp(0.5) * rfft(kitchen(near))
    side = irfft(spread * amp(read(width_spectrum, hz)), N)
    return np.array([mid + side, mid - side])


def record(dry):
    """Band limiting: a linear-phase low-pass at 15.5 kHz."""
    lowpass = signal.firwin(511, 15500, window=("kaiser", 9), fs=SR)
    return signal.oaconvolve(dry, lowpass[None], "same")


dry = scene()
out = record(dry)
waveform_to_disk(out)
```